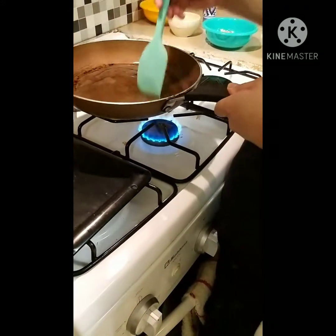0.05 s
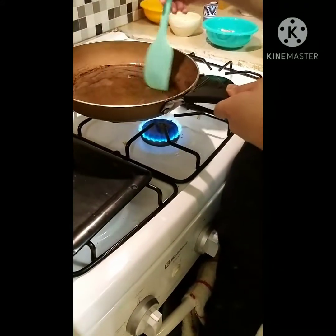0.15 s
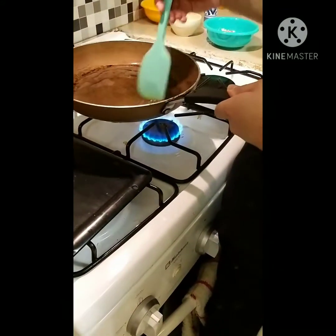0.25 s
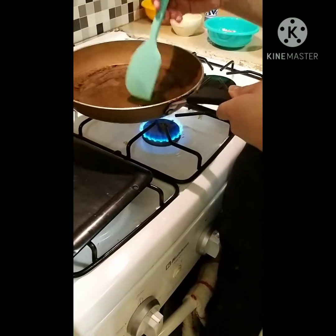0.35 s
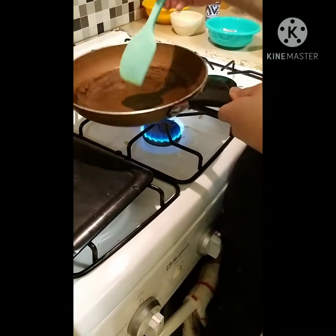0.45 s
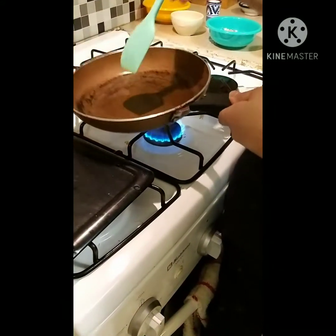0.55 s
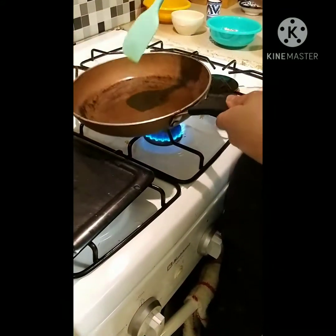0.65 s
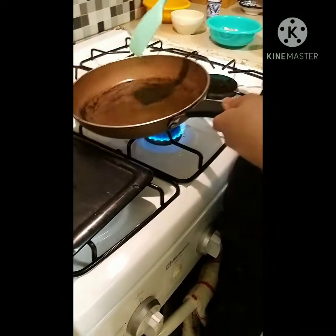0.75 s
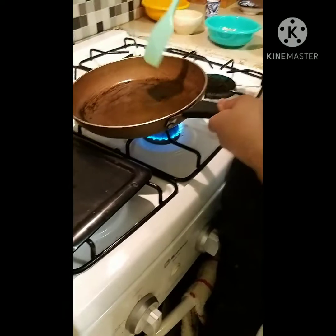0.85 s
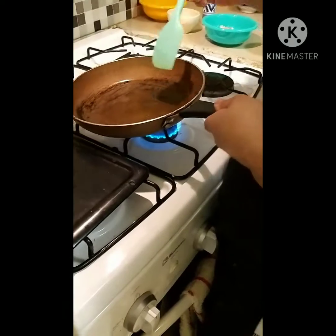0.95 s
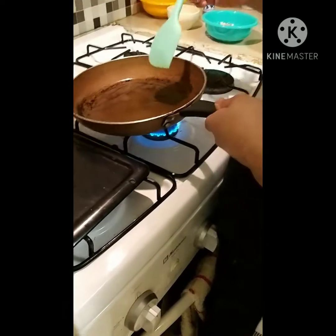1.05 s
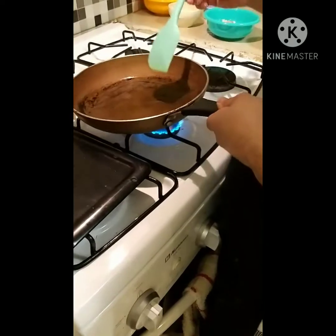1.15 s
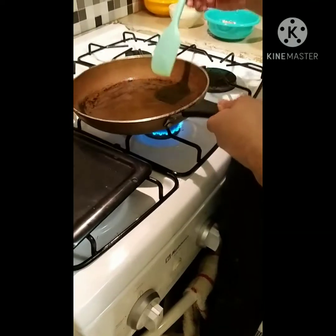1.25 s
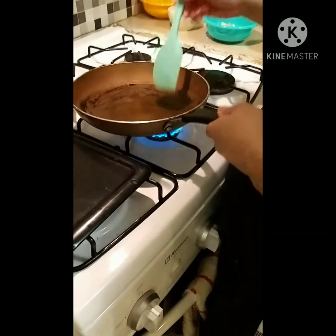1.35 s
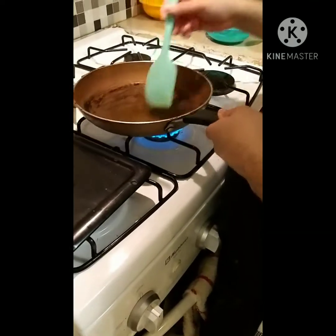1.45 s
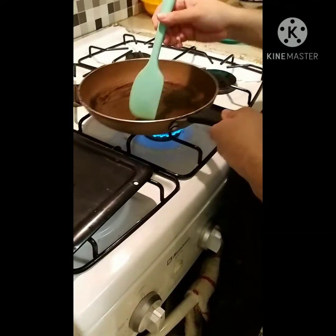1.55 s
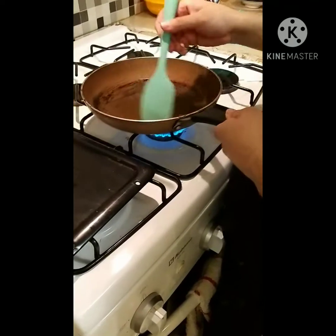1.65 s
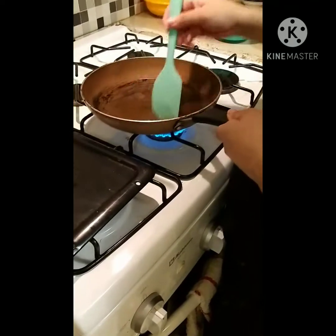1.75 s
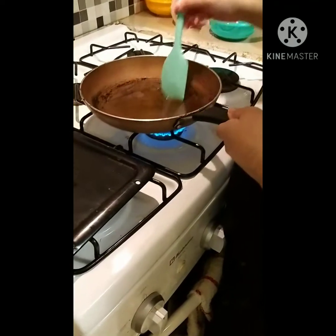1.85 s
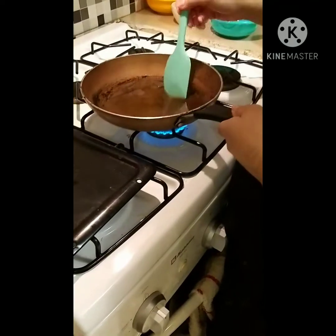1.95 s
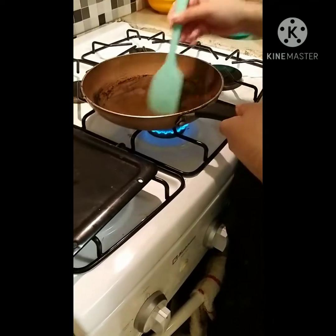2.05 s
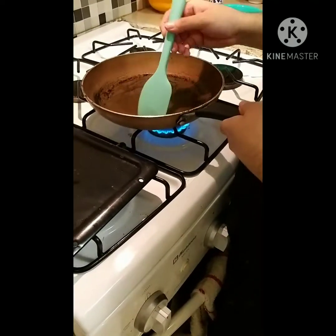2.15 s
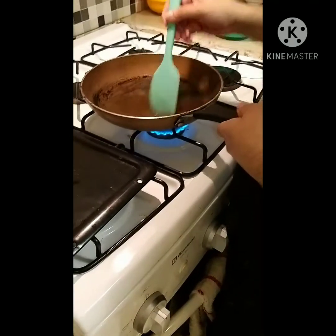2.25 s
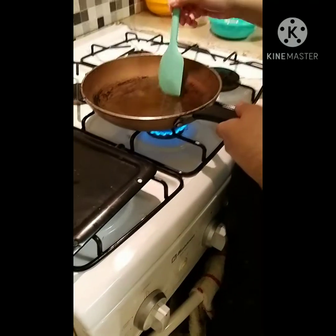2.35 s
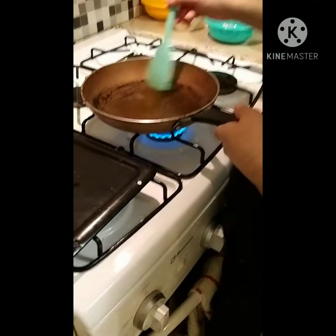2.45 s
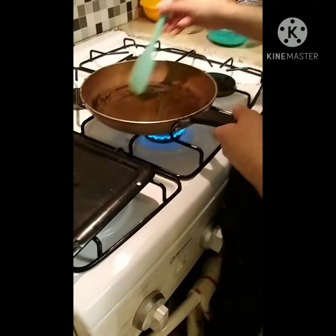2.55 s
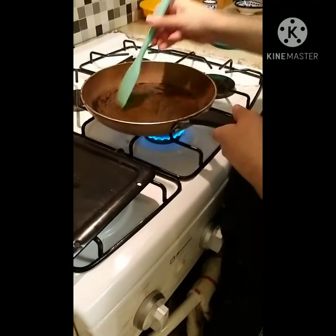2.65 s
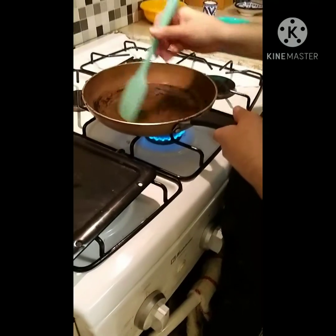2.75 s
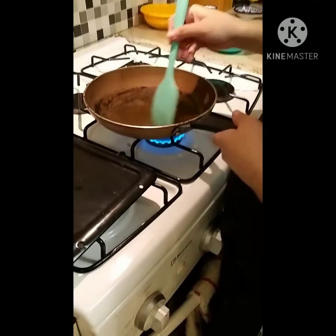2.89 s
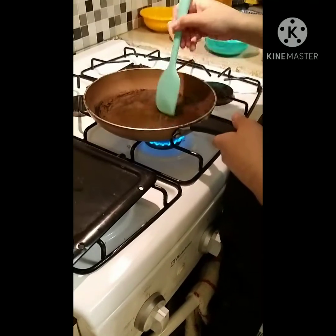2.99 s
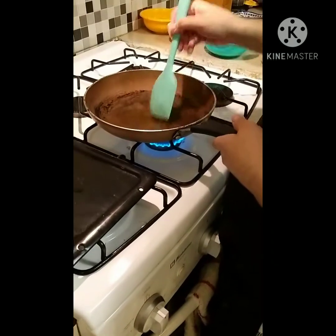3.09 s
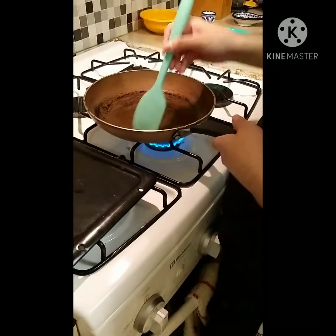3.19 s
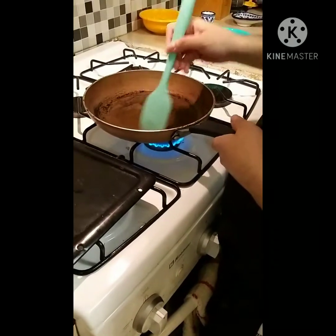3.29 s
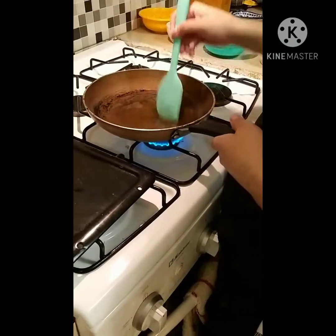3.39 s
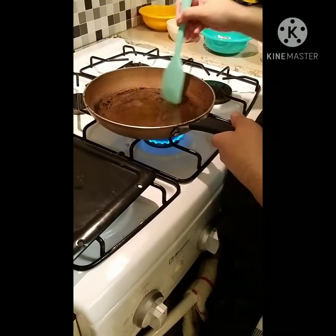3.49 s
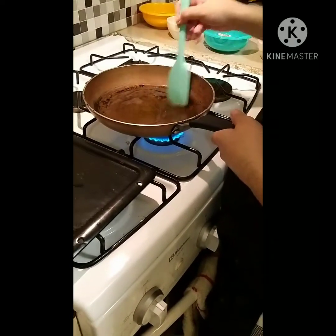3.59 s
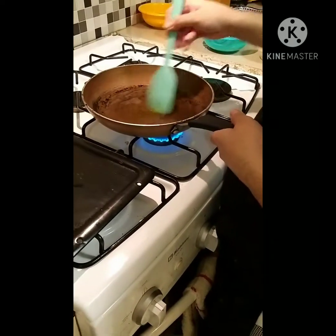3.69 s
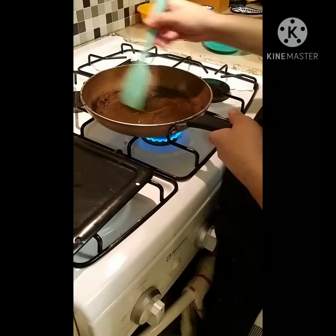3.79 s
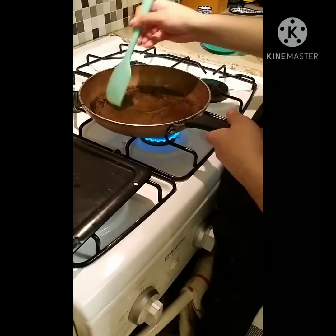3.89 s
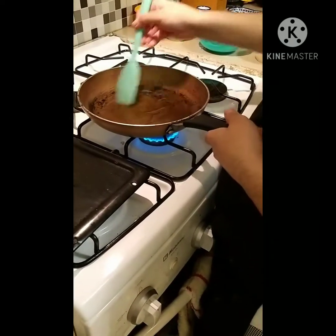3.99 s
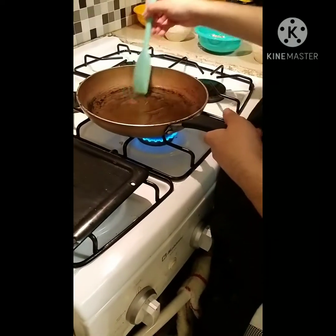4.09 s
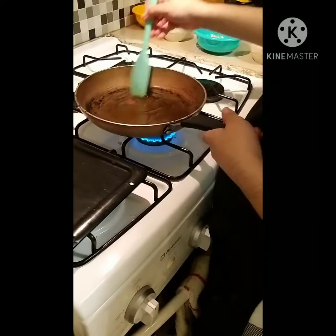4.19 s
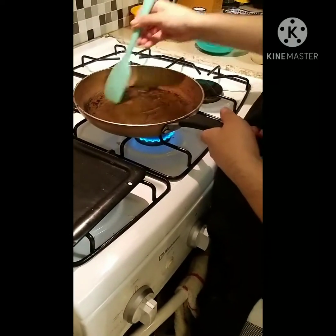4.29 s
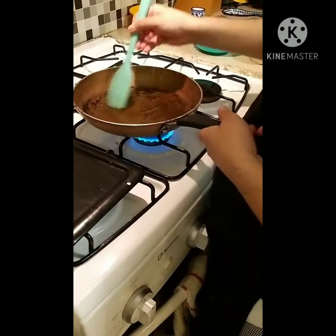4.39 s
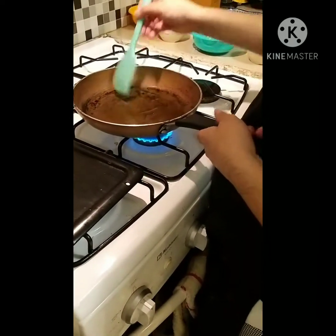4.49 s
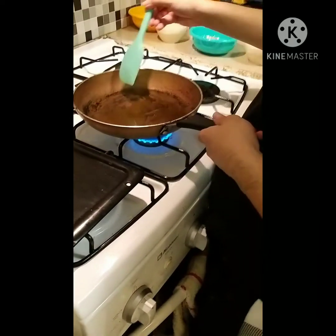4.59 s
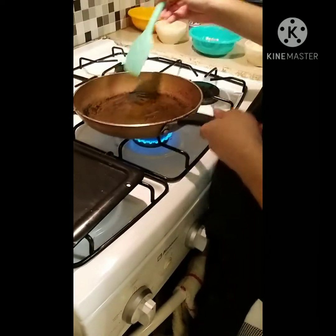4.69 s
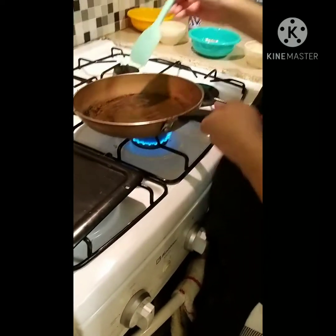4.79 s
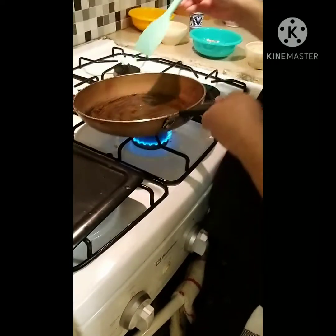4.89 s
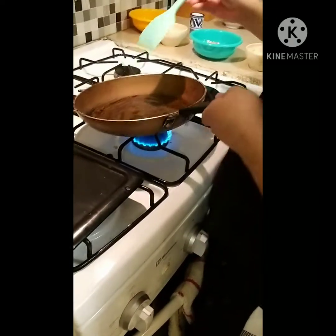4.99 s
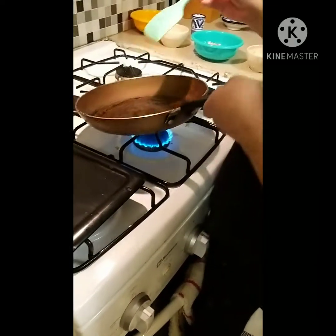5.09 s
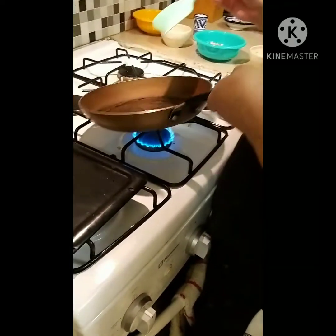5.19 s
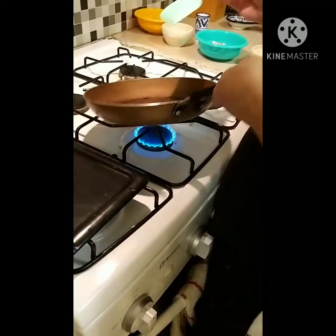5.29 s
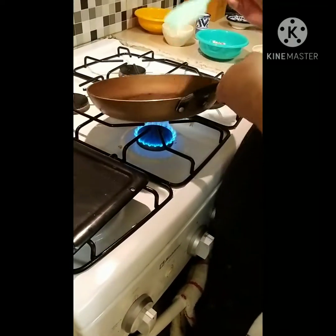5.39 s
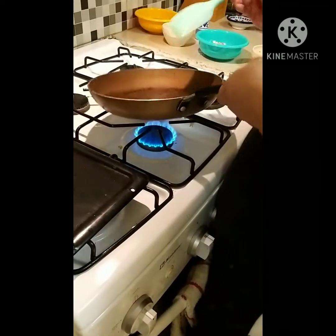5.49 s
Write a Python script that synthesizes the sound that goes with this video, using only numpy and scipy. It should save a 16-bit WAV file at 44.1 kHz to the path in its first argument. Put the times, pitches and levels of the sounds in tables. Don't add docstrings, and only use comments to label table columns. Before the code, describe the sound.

In a tiled kitchen, a low steady motor hum and soft gas-flame hiss run throughout. After about a second a metal pan touches an iron grate, then lands with a loud, bright, chattering clatter. Much quieter soft-spatula taps follow during stirring, and near the end the pan leaves the grate with one clear clink and small rattles. Close stereo microphones, lively room.

```python
import sys
import numpy as np
from scipy import signal
from scipy.fft import rfft, irfft
from scipy.io import wavfile
from scipy.ndimage import uniform_filter1d

SR = 44100
rng = np.random.default_rng(int(sys.argv[2]) if len(sys.argv) > 2 else 0)


def file_out(sig):
    cols = np.atleast_2d(sig).T
    lim = np.clip(cols, -1, 1)
    pcm = np.round(lim * 32767).astype(np.int16)
    wavfile.write(sys.argv[1], SR, pcm)


def ratio_of_db(decibels):
    return 10 ** (np.asarray(decibels, float) / 20)


N = 244314
TIME = np.arange(SR // 2) / SR


def read(points, hz):
    f, value = np.transpose(points)
    return np.interp(np.log(hz + 1), np.log(f + 1), value)


def evened(x):
    return x / np.sqrt(np.mean(x ** 2) + 1e-20)


def add(mix, s, sound):
    part = mix[:, round(s * SR):][:, :sound.shape[1]]
    part += sound[:, :part.shape[1]]


def shaped(z, gain, size):
    return signal.istft(z * gain, nperseg=size, noverlap=size * 3 // 4)[1]


def free(hz, t60, t=TIME):
    rate = 2j * np.pi * hz - np.log(1000) / t60
    return np.exp(np.outer(rate, t).astype(np.complex64))


def body(modes, split):
    table, count = np.transpose(modes), len(modes)
    spread = 3.0 + split * table[0]
    near = [table[0] + spread * rng.uniform(0.36, 1.4, count) * k for k in (0, 1, -1)]
    near_db = np.repeat([0, -4.0, -7.0], count)
    return np.tile(table, 3), near_db, free(np.concatenate(near), np.tile(table[1], 3))


def strike(waves, hz, db, side_db):
    turn, lag = rng.uniform(-np.pi, np.pi, (len(hz), 2)).T
    lag = lag * np.clip(hz / 900 - .2, .12, .95)
    weights = [ratio_of_db(db + k * side_db / 2) * np.exp(1j * (turn + k * lag / 2)) for k in (1, -1)]
    onset = np.minimum(TIME[:waves.shape[1]] / 0.0011, 1)
    return (np.array(weights, np.complex64) @ waves).imag * onset


def ring(modes, place, tilt_db):
    table, near_db, waves = modes
    hz = table[0]
    return strike(waves, hz, table[3 + place] + near_db + tilt_db * np.log2(hz / 2000), table[2])


# frequency in Hz, t60 in seconds.
MINOR_T60 = [(300, 0.54), (1500, 0.38), (5000, 0.23), (14000, 0.12)]


def minor():
    hz = 200 + 14500 * rng.random(320) ** 1.5
    t60 = read(MINOR_T60, hz) * rng.uniform(0.28, 0.73, 320)
    return hz, free(hz, t60, TIME[:SR // 4])


# frequency in Hz, level in dB per Hz.
CLATTER = [(90, -29.5), (200, -14), (450, -5), (900, -3.5), (2400, -5.5), (4000, -12.5), (5300, -10.5),
           (7000, -14), (8000, -25), (9000, -26), (12400, -34.5), (15000, -39.5), (16000, -60.5)]
CLATTER_T60, CHATTER_DB, MINOR_DB = 0.069, 3.5, -15


def clatter(small, tilt_db):
    def colour_db(f):
        return read(CLATTER, f) + tilt_db * np.log2(f / 2000 + 0.056)

    size = len(TIME)
    colour = ratio_of_db(colour_db(np.fft.rfftfreq(size, 1 / SR)))
    crack = evened(irfft(rfft(rng.standard_normal((2, size))) * colour, size))
    crack *= ratio_of_db(-60 * TIME / CLATTER_T60) * np.minimum(TIME / 0.0025, 1) * ratio_of_db([[1.8], [-1.8]])
    rebounds = evened(uniform_filter1d(rng.standard_normal(size), size=70))
    crack *= ratio_of_db(CHATTER_DB * rebounds - 1.5)
    hz, waves = small
    strength_db = MINOR_DB + colour_db(hz) + 2.71 * np.log2(hz / 2000) + 3.6 * rng.standard_normal(len(hz))
    add(crack, 0, strike(waves, hz, strength_db, 1.5))
    return crack


# frequency in Hz, t60 in seconds, left-right balance in dB, then
# level in dB at first touch, at full landing and sliding off.
GRATE = [(476, 0.29, 6.5, -11, -12, -17), (704, 0.1, 8.5, -11, 0, -1.5), (799, 0.42, 5, -4, -4.5, -3.5),
         (860, .5, 4.5, -6, -4, -7.5), (975, 0.6, 5.5, 0, -11, -2.5), (1094, 0.074, 2, -11.5, -5.5, -27),
         (1350, 0.39, -4.5, -13, -9.5, -28), (1464, 0.57, 2, 0, -5.5, -1.5),
         (1518, 0.53, 1.5, -11, -12, -6), (1894, 0.36, 2.5, -10.5, 3, -7), (2043, 0.24, 5, 1, -5.5, 0),
         (2410, 0.1, 4, -11, -5.5, -22), (2553, .34, 4.5, -6, -11.5, 0), (2700, 0.33, 5.5, -3.5, -9, -22),
         (3005, 0.32, 3.5, -2, -6, -6), (3580, 0.25, 17, -8, -9.5, -11),
           (3610, .3, 3.5, -13.5, -10.5, -26), (4170, 0.29, 1.5, 0.5, -7, -5),
           (4590, .15, 4.5, -8.5, -13, -17), (5105, 0.2, 1.5, -11, -8.5, 0), (5500, .42, 1.5, -18, -13, -5),
           (5960, 0.13, 10, -12.5, -6.5, -5), (6870, 0.25, 3, -15.5, -6, -9.5),
           (7870, 0.26, 16, -20.5, -15.5, -16), (8740, 0.198, 2, -14, -14, -14),
           (9150, 0.32, 13.5, -26, -20, -26), (10550, 0.26, 0.5, -23.5, -19.5, -17),
           (11100, 0.074, 2.5, -28.5, -30, -37)]
STOVE_TOP = [(73, 0.26, 2, -7.5, -3.5, -18), (103, 0.28, 3, -10, -11, -1), (133.4, 0.75, 2, -8, -15, -8.5),
             (143.04, 0.86, 1, -9.5, -12, -4), (175.3, 0.2, 2, -15.5, -8, -3), (274.6, 0.26, 2, -8, -6, -9),
             (331, 0.15, 2, -16.5, -12.5, -6.5)]
PLACE_STARTS = (0, 1.3, 2)
RING_DB = (-10.5, -14.5, -11.5)
# start in seconds, blow level in dB, hardness in dB per octave.
KNOCKS = [(1.027, -28, -1.5), (1.038, -33, -5), (1.082, -29, -0.5), (1.095, -40.5, -7), (1.155, -51.5, -8),
          (1.332, -35.5, -5), (1.347, -17.5, 4.5), (1.356, -21, 0.5), (1.366, -20, 1.5), (1.382, -28, -4),
          (1.397, -20.5, 4.5), (1.401, -21, 0), (1.412, -26, -4.5), (1.428, -32.5, 6.5), (1.421, -27.5, -1),
          (1.436, -25, -2.5), (1.447, -31, -4), (1.505, -38, -4.5), (1.583, -32, -1), (3.282, -45.5, -0.5),
          (3.294, -54.5, -1.5), (3.645, -62, -7), (4.693, -51.5, -7), (4.721, -28.5, -1.1),
          (4.749, -44.5, -4), (4.767, -35, -4.5), (4.845, -49.5, -5.5), (4.958, -55.5, -4.5)]
THUMP_DB, THUMP_SOFT_DB = -7.5, -1.15


def knock(grate, top, small, s, db, tilt_db):
    place = np.searchsorted(PLACE_STARTS, s) - 1
    thump = ratio_of_db(THUMP_DB + THUMP_SOFT_DB * tilt_db) * ring(top, place, 0) * np.minimum(TIME / 0.014, 1)
    metal = ratio_of_db(RING_DB[place]) * ring(grate, place, tilt_db) + ratio_of_db(1) * clatter(small, tilt_db)
    return ratio_of_db(db) * (metal + thump)


def knocks(hits, small):
    grate, top = body(GRATE, .008), body(STOVE_TOP, 0.0041)
    for row in KNOCKS:
        add(hits, row[0], knock(grate, top, small, *row))


# start in seconds, frequency in Hz, level in dB.
PAN_NOTES = [(1.027, 782, -30), (1.038, 2700, -30), (1.095, 1464, -27), (1.16, 975, -33),
             (1.332, 3100, -32.5), (1.347, 7060, -10), (1.355, 2050, -10.5), (1.366, 5105, -15.5),
             (1.401, 3014, -9.5), (1.412, 2410, -14.5), (1.428, 859, -17), (1.583, 4170, -29.5),
             (3.248, 2012, -42), (3.249, 4690, -47), (3.256, 1986, -42), (3.283, 2036, -43),
             (3.282, 6900, -48.5), (3.294, 2036, -36.5), (3.645, 2036, -56), (3.948, 1384, -51),
             (4.6, 1362, -52.5), (5.5, 3780, -63), (4.693, 2036, -55.5), (1.436, 1000, -19.5),
             (4.721, 2027, -16), (4.748, 960, -29), (4.767, 6180, -39.5), (4.845, 1416, -39),
             (4.958, 2036, -46)]


def pan_notes(hits):
    for s, hz, db in PAN_NOTES:
        fade = ratio_of_db(db - 60 * TIME / 0.057 + np.array([[2.5], [-2.5]]))
        add(hits, s, fade * np.sin(2 * np.pi * hz * TIME) * np.minimum(TIME / 0.0033, 1))


# frequency in Hz, t60 in seconds, left-right balance in dB, level in dB.
PAN = [(833, 0.47, 12, -11), (1063, .1, 2, -11), (1362, 0.13, -9, -5.5), (1877, 0.1, 20, -9),
       (2036, 0.052, 1, 5.5), (2466, 0.099, -4, -8.5), (2924, 0.096, 11.5, -9.5), (3346, 0.054, 0, -9),
       (3850, .06, 6, -9), (4690, 0.053, 2, -9), (5400, .05, -2, -20)]
# start in seconds, blow level in dB, hardness in dB per octave.
TAPS = [
    (2.02, -59.5, -8),
    (2.408, -56.5, -8),
    (3.248, -41.5, 1.5),
    (3.256, -38.5, 0),
    (3.948, -45, -2.5),
    (4.335, -47.5, -2.5),
    (4.601, -52.5, -8),
]


def taps(hits, small):
    pan = body(PAN, 0.017)
    for s, db, tilt_db in TAPS:
        tick = ratio_of_db(-5.5) * clatter(small, tilt_db - 2.5)
        add(hits, s, ratio_of_db(db) * (0.69 * ring(pan, 0, tilt_db) + tick))


# frequency in Hz, t60 in seconds.
KITCHEN_T60 = [(100, 1), (500, 0.92), (1500, 0.84), (4000, 0.81), (8000, 0.56), (14000, 0.45)]


def kitchen(x):
    echoes = np.zeros((2, SR))
    at = np.arange(200, SR - 20, 20) + rng.integers(0, 20, (2, (SR - 201) // 20))
    np.put_along_axis(echoes, at, rng.choice([-1., 1.], at.shape), 1)
    hz, t, z = signal.stft(echoes, SR, nperseg=256, noverlap=192)
    tail = shaped(z, ratio_of_db(-60 * t / read(KITCHEN_T60, hz)[:, None]), size=256)
    wet = signal.fftconvolve(x, tail / np.linalg.norm(tail[0]), axes=1)[:, :N]
    low = signal.sosfiltfilt(signal.butter(2, 450, fs=SR, output="sos"), wet)
    return wet - low + low.mean(0) * np.sqrt(2)


def drift(rate, count):
    steps = rng.standard_normal((count, 400))
    smooth = uniform_filter1d(steps, size=4, axis=1) * 2
    at = np.arange(N) / SR * rate * 4
    return np.array([np.interp(at, np.arange(400), row) for row in smooth])


# time in seconds, level of the fundamental in dB.
HUM = [(0, -54.5), (.5, -57.5), (1.5, -54), (2.3, -54), (2.85, -51), (4.1, -57.5), (5.1, -52.5),
       (5.54, -50.5)]
# multiple of the fundamental, level against the third in dB.
HUM_ORDERS = [(2, -8.5), (4, -8), (5, -6), (6, -17.5)]
HUM_HZ, THIRD_DB = 59.2, -54.5


def hum():
    t = np.arange(N) / SR
    turns, waver = 2 * np.pi * HUM_HZ * t, drift(9, count=12)
    out = ratio_of_db(np.interp(t, *np.transpose(HUM)) + 0.51 * waver[0]) * np.sin(turns + .15 * waver[7])
    out += ratio_of_db(THIRD_DB + 2.6 * waver[1]) * np.sin(3 * turns + 1.1 * waver[2])
    for i, (k, db) in enumerate(HUM_ORDERS):
        strength = ratio_of_db(THIRD_DB + db + 4.0 * waver[3 + i])
        out += strength * np.sin(round(k) * turns + 0.43 * waver[8 + i])
    return np.sqrt(2) * out * ratio_of_db([[.9], [-.9]])


# start in seconds, end in seconds, level in dB.
SIZZLE = [
    (0, 0.033, -61.5),
    (.1, .3, -73.5),
    (2.58, 2.68, -75.5),
    (2.74, 2.86, -70),
]


def sizzle_db(t):
    spurts = [db - np.maximum(150 * (start - t), 140 * (t - end)).clip(0) for start, end, db in SIZZLE]
    return np.max(spurts, axis=0)


# frequency in Hz, level in dB per Hz.
AIR = [(25, -38.5), (45, -20.5), (70, -11.5), (90, -25.5), (130, -6.5), (300, -8.5), (450, -14),
       (1200, -23), (4500, -32.5), (5800, -35.5), (7200, -37), (8000, -42), (12000, -44), (16000, -41.5)]
# frequency in Hz, width in Hz, rise in dB.
AIR_PEAKS = [(870, 66, 2.5), (975, 42, 4), (2050, 160, 2), (2700, 130, 4.5), (6460, 350, 4)]
# frequency in Hz, correlation from -1 to 1.
LIKENESS = [(60, 0.93), (130, 1), (290, 0.96), (640, 0.0083), (1410, -0.14), (3100, -0.062), (6820, -0.01),
            (15000, -0.52)]
# frequency in Hz, left-right balance in dB.
BALANCE_DB = [(60, -0.5), (180, -1.5), (550, 1), (1650, 3), (4970, 3.0), (15000, 2)]
AIR_DB, SIZZLE_HZ, SIZZLE_WIDTH = -55.5, 12000, 2400


def air():
    frames, hz = N // 256 + 5, np.fft.rfftfreq(1024, 1 / SR)
    a, b, c, d, patches = rng.standard_normal((frames, 513, 5)).T
    patches = evened(uniform_filter1d(uniform_filter1d(patches, 10, 0), 12, 1))
    t = np.arange(frames) * 256 / SR
    same = np.clip(read(LIKENESS, hz), -1, 1)[:, None]
    left = a + 1j * b
    z = np.array([left, same * left + np.sqrt(1 - same ** 2) * (c + 1j * d)])
    side = read(BALANCE_DB, hz)[:, None] / 2
    z *= ratio_of_db(np.array([side, -side]) + 1.7 * patches)
    peaks_db = sum(db / (1 + ((hz - f) / width) ** 2) for f, width, db in AIR_PEAKS)
    colour = ratio_of_db(read(AIR, hz) + peaks_db)
    colour /= np.linalg.norm(colour[(hz > 300) & (hz < 7000)])
    fizz = np.exp(-((hz - SIZZLE_HZ) / SIZZLE_WIDTH) ** 2 / 2)
    fizz /= np.linalg.norm(fizz)
    power = (colour[:, None] * ratio_of_db(AIR_DB)) ** 2 + (fizz[:, None] * ratio_of_db(sizzle_db(t))) ** 2
    return ratio_of_db(0.5) * shaped(z, np.sqrt(power), size=1024)[:, 512:N + 512]


def scene():
    hits, small = np.zeros((2, N)), minor()
    knocks(hits, small)
    pan_notes(hits)
    taps(hits, small)
    return hits + ratio_of_db(-9.5) * kitchen(hits) + hum() + air()


def top_cut(x):
    return signal.sosfilt(signal.butter(12, 16320, fs=SR, output="sos"), x)


DUCK_DB, DUCK_S, RECOVER_S = 2.5, .4, 0.63
CEILING, EDGE_HZ = 1.2, 15500


def record(dry):
    loudness = (dry ** 2).mean(0)
    for s in (DUCK_S, RECOVER_S):
        loudness = signal.lfilter([1], [1, -np.exp(-1 / (s * SR))], loudness)
    ducked = dry / ratio_of_db(DUCK_DB * loudness / loudness.max())
    heard = CEILING * np.tanh(ducked / CEILING)
    edge = signal.firwin(401, EDGE_HZ, window=("kaiser", 5), fs=SR)
    heard = signal.oaconvolve(heard, edge[None], "same", axes=1)
    return top_cut(heard)


dry = scene()
out = record(dry)
file_out(out)
```